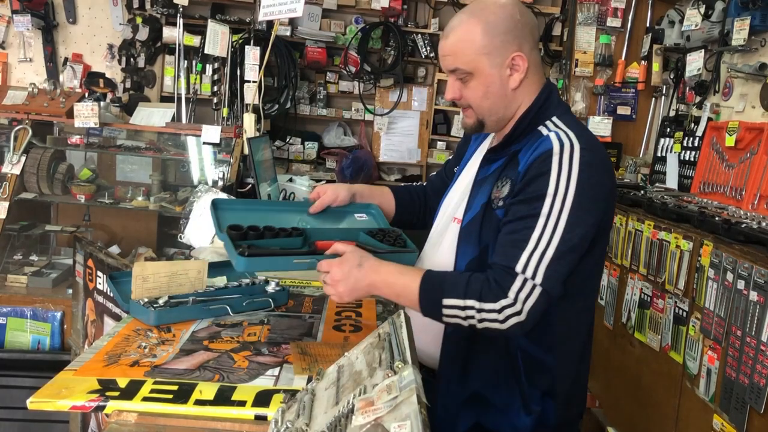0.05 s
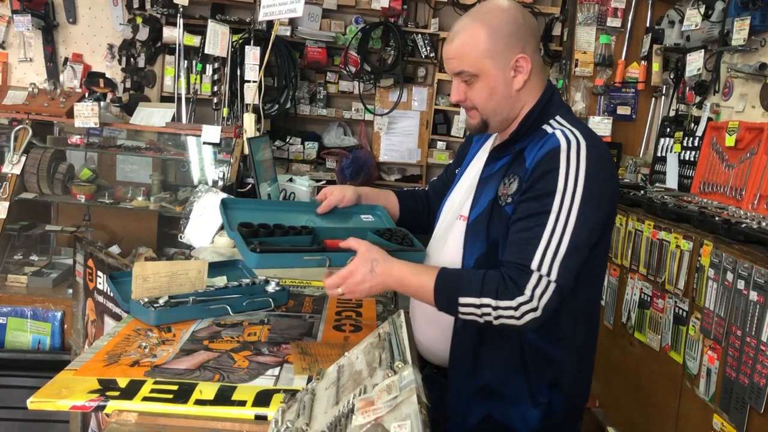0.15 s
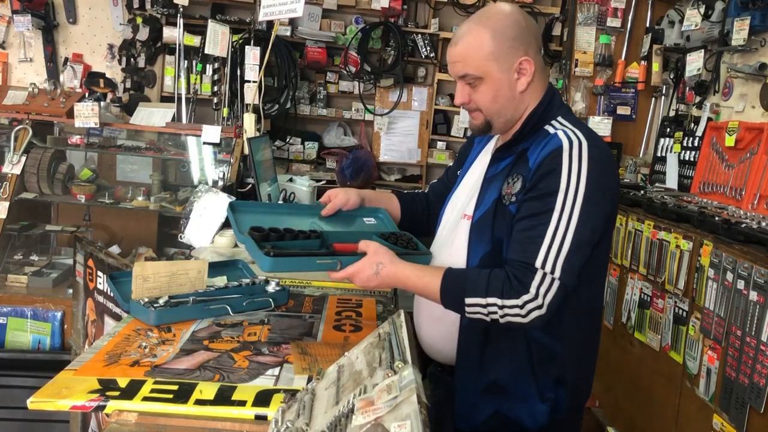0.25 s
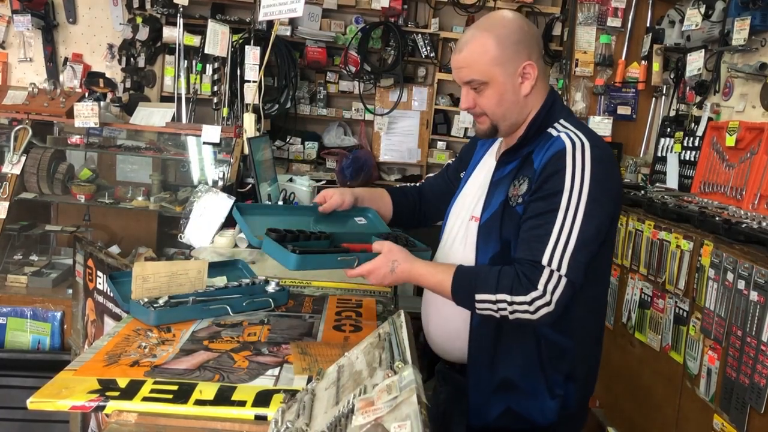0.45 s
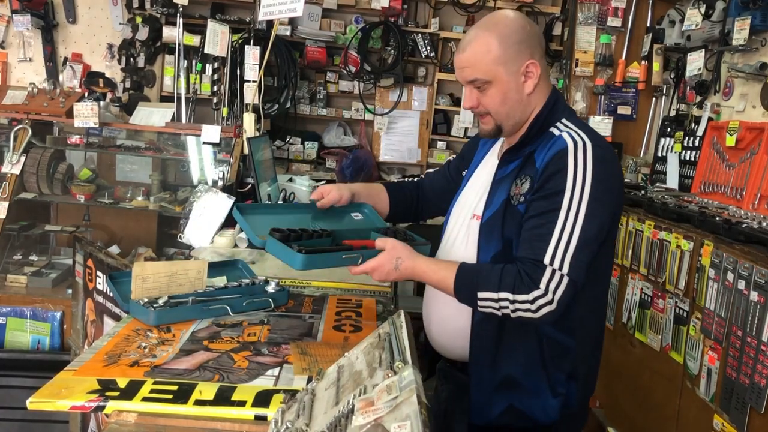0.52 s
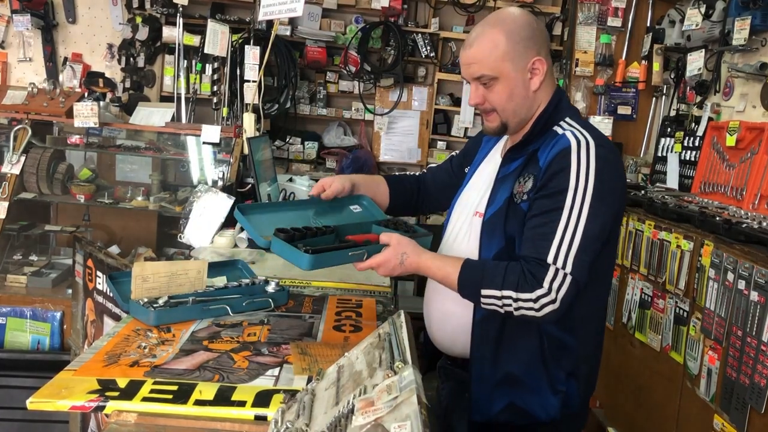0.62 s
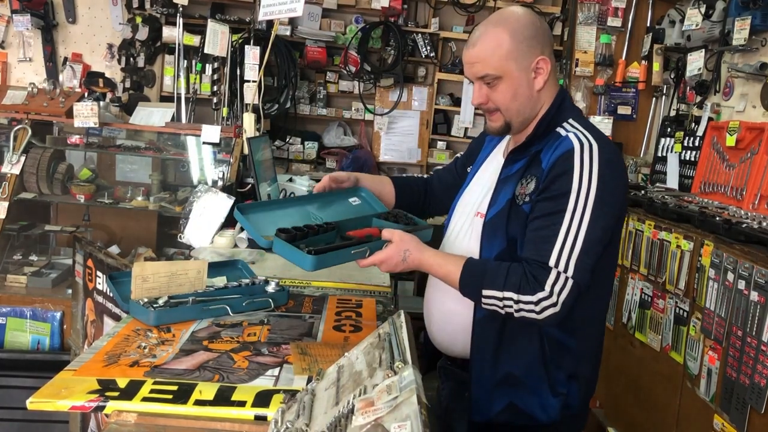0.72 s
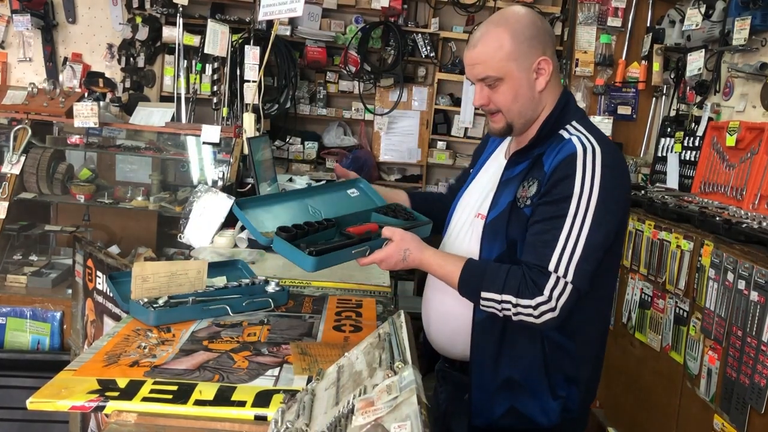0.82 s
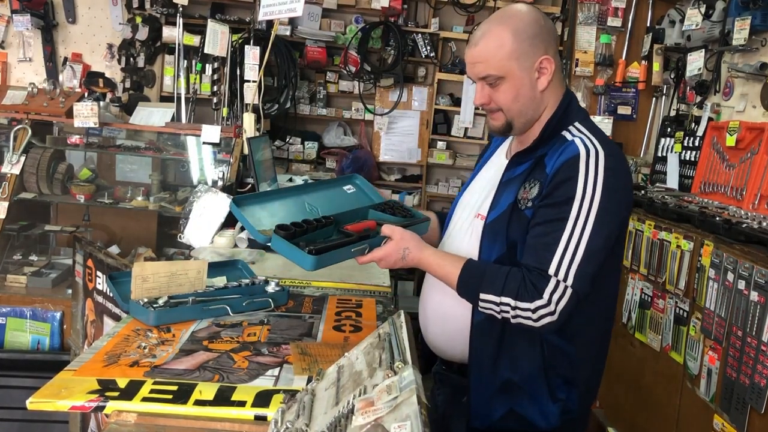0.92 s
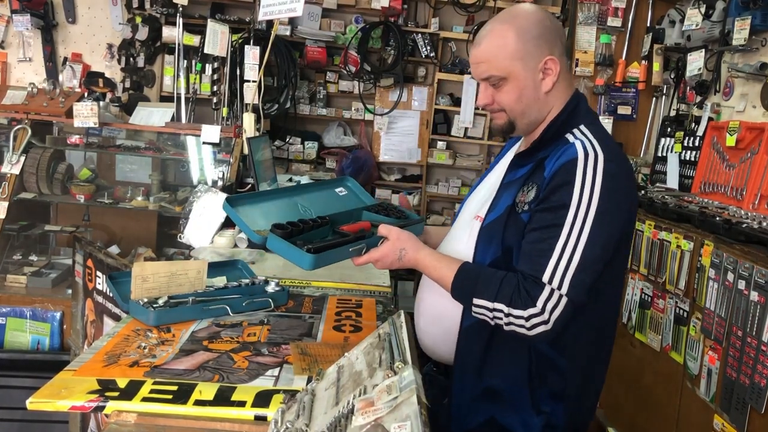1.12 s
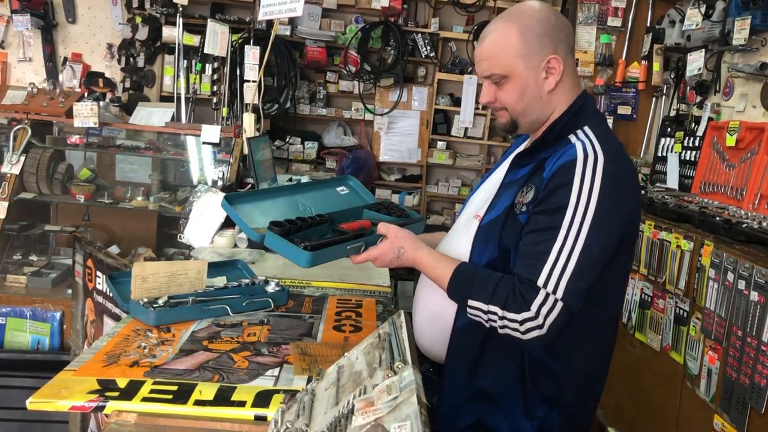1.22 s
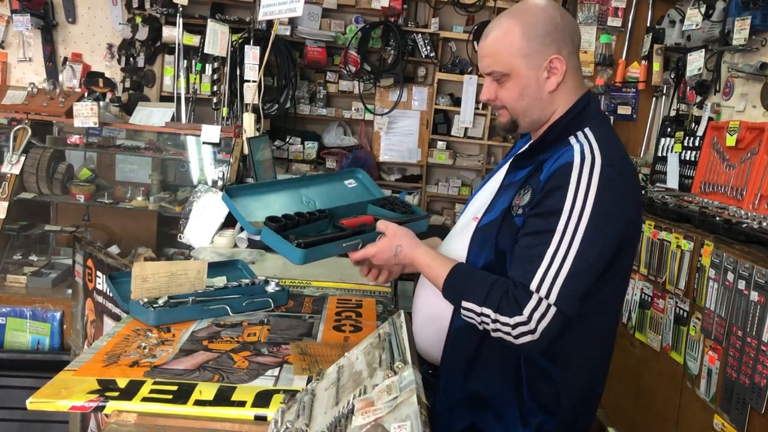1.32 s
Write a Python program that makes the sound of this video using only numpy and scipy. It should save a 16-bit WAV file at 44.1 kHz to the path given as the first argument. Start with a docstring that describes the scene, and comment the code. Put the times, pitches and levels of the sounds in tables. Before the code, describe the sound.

Two sharp plastic case latch snaps in a small shop, then faint tool ticks

```python
"""Latches of a plastic tool case

In a small shop two sharp latch snaps are heard, each led by a dull knock; later the tools shift and tick faintly.
Quick runs of tiny impacts ring the pitches of the latch, the shell, the tray or a tool.
The shop answers snaps, knocks, taps and ticks with dying noise; the hollow case keeps some pitches of it alive.
Underneath lie room tone and rumble (noise), hum (wavering sines) and the dying echo of an earlier clatter.
"""
import sys
import numpy as np
from scipy import signal
from scipy.io import wavfile

SR = 44100
rng = np.random.default_rng(int(sys.argv[2]) if len(sys.argv) > 2 else 0)


def transcribe(signal):
    """Save signal, clipped to [-1, 1], as a 16-bit WAV file at the path in sys.argv[1]."""
    frames = np.atleast_2d(signal).T
    limited = np.clip(frames, -1, 1)
    pcm = np.round(limited * 32767).astype(np.int16)
    wavfile.write(sys.argv[1], SR, pcm)


def rack_gain(trim_db):
    """Turn a fader trim in dB into the linear factor to multiply a signal by."""
    fader = np.asarray(trim_db, float)
    return 10 ** (fader / 20)


N = 59535  # length in samples

# Levels in these tables are relative: filters and the mix shape them further.
# edges of the third-octave noise bands: hz
BAND_EDGES = 30 * 2 ** np.arange(0, 9.3, 1 / 3)
# room tone, low and high parts each scaled afterwards: pitch_hz, level_db (per Hz)
ROOM_TONE_COLOUR = [(28, -22), (40, -14.5), (70, 0.5), (110, 2), (233, -1), (420, -1), (649, -15.5),
                    (1130, -17), (2010, -21.5), (5000, -28.5), (10000, -35.5), (16000, -39)]
# level of the room tone above 600 Hz over time: time_s, level_db
HIGH_TONE_LEVEL = [(0.0, -61.5), (0.5, -65), (0.6, -66), (0.7, -62.5), (0.84, -66.5), (1.0, -67.5),
                   (1.15, -68), (1.35, -74.5)]
# colour of the echo of an earlier clatter: pitch_hz, level_db (per Hz)
EARLIER_COLOUR = [(88, -49), (150, -20.5), (249, -2), (457, -3), (534, 0), (637, -13), (1660, -4),
                  (5570, -15.5), (16000, -46.5)]
# wavering tones of appliances: pitch_hz, level_db (rms, before the waver)
APPLIANCE_TONES = [(172.3, -75.5), (231.5, -78), (366.1, -76.5), (398.4, -89)]
# faint wavering tones that fade out: pitch_hz, level_db (rms, before the waver)
FADING_TONES = [(1157, -80), (1990, -87)]
# dull knocks of the case shell: full_s (the rattle reaches full strength),
# level_db, tilt_db (per octave), rattle_s (60 dB fall), echo_db, echo_tilt_db (per octave)
SHELL_KNOCKS = [(0.2198, -42, -0.1, .035, -32, -5.0), (0.2315, -50, -3.0, .03, -40, -5.0),
                (0.2920, -33, -0.5, .03, -22, -4.0), (0.450, -54, -5.0, .04, -36, -7.0)]
# ways the shell rings: pitch_hz, level_db, ring_s (60 dB fall, before the limit in strike)
SHELL_MODES = [(1190, -11, .012), (1305, -9, 0.079), (1730, -14, 0.0033), (1990, -2.5, 0.0052),
               (2043, -4.5, .04), (2364, -6.5, 0.018), (2788, -2.5, 0.035), (3620, -9, .012),
               (4490, 6.5, 0.0061), (5540, -10, .005), (6695, -2.5, 0.0016), (9900, -6, 0.0039)]
# single pitches, both lingering rings of the shell and small pings:
# start_s, level_db, pitch_hz, rattle_s (60 dB fall), ring_s (60 dB fall)
SINGLE_PITCHES = [(0.219, -48, 4530, .012, .012), (0.256, -42.5, 1300, .03, 0.06),
                  (0.311, -37, 770, 0.0081, 0.03), (0.331, -41, 1330, .03, .06),
                  (0.352, -41, 1170, 0.01, .03), (0.385, -46.5, 1304, .05, 0.055),
                  (0.39, -44, 2790, .03, 0.035), (0.461, -52, 833, 0.033, 0.045),
                  (0.925, -62, 3750, .03, 0.013), (0.989, -53.5, 4330, 0.0054, 0.011)]
# time the shop echo takes to fall 60 dB: pitch_hz, fall_s
ECHO_FALL = [(150, 0.24), (800, 0.43), (2100, 0.51), (5500, 0.33), (14600, .24)]
# colour of the shop echo: pitch_hz, level_db (per Hz)
ECHO_COLOUR = [(150, -34.5), (400, -10), (800, -10), (1300, -7), (2100, -9), (3300, -6), (5200, -1),
               (7800, -5.5), (10000, 2), (13500, -2.1), (16000, -7.5)]
# pitches the hollow case keeps alive in the tail: pitch_hz
HOLLOW_PITCHES = [585, 780, 1295, 1370, 2030, 2820, 3190, 3420, 3680, 4930, 5760, 10280, 12710, 13850]
# one row for each of those pitches: width_hz, level_db
HOLLOW_PEAKS = [(25, -6), (31.5, 6), (18, 7.5), (22, 1.5), (39.7, -2), (40, -7.5), (35, 2.5), (50, 2.5),
                (40, -1), (30, 3), (60, -3.5), (150, -3.5), (90, 6.5), (150, -1)]
# latch snaps and their rebounds: full_s (the rattle reaches full strength),
# level_db, tilt_db (per octave), rattle_s (60 dB fall), shell_db, echo_db, echo_tilt_db (per octave)
LATCH_SNAPS = [(0.2428, -27, -1.0, .035, -5, -12, -1.5), (0.2497, -33, -1.5, .03, -4, -25, -1.5),
               (0.2545, -38, -1.5, .02, -4, -30, -1.5), (0.3018, -18, 1.5, .016, -18, -1.5, 0.1),
               (0.3105, -29, -1.0, .025, -10, -28, -1.0), (0.3205, -31, 0.1, .015, -18, -30, 0.1)]
# ways the latch rings: pitch_hz, level_db, ring_s (60 dB fall, before the limit in strike)
LATCH_MODES = [(1900, -34.5, 0.018), (2960, -27, 0.0021), (3475, -5.5, 0.015), (4860, -10, 0.012),
               (5530, -1.5, 0.0046), (6100, 4, 0.00084), (6840, 1.5, 0.0005), (9510, 0, 0.0082),
               (10520, 3, 0.0037), (11170, -7, 0.001), (12430, 3, 0.009), (14260, 8, 0.012),
               (15400, -9.5, .004)]
# soft bumps of the case against the hand: start_s, level_db, pitch_hz, ring_s (60 dB fall)
HAND_BUMPS = [(0.303, -72, 115, .1), (0.306, -69, 175, .08), (0.31, -65.5, 240, .08),
              (0.305, -72, 335, .06), (0.451, -76, 377, 0.085), (0.749, -78, 111, .07)]
# a tool slides a little in its tray: middle_s, length_s, level_db (rms at the peak)
TOOL_SLIDES = [(0.627, 0.067, -55.5), (0.758, 0.064, -61.5), (0.998, 0.034, -67)]
# ways the tray rings under a slide: pitch_hz, level_db, ring_s (60 dB fall, before the limit in strike)
SLIDE_MODES = [(1430, 9.5, 0.019), (1800, 10.5, 0.034), (2230, 17, 0.0064), (2685, 7, 0.023),
               (4430, 2, 0.019)]
# grainy taps of a tool on its tray: full_s (the rattle reaches full strength),
# level_db, tilt_db (per octave), rattle_s (60 dB fall), echo_db, echo_tilt_db (per octave)
TRAY_TAPS = [(0.7444, -67.5, 9, .06, -35.5, -5), (0.9901, -71, -6, .06, -46.5, -8),
             (1.273, -81, -10.5, 0.025, -49, -5.5)]
# ways the tray rings under a tap: pitch_hz, level_db, ring_s (60 dB fall, before the limit in strike)
TRAY_MODES = [(930, 5, 0.01), (1420, 3, 0.015), (1900, -6, 0.014), (2280, 3, 0.0062), (4330, -4, .004),
              (6990, -6, .002)]
# a tool ticks in its tray: full_s (the rattle reaches full strength),
# level_db, lowest_pitch_hz, rattle_s (60 dB fall), echo_db, echo_tilt_db (per octave)
TOOL_TICKS = [(0.9215, -56, 3600, .006, -46, -2.5)]
# ways a ticking tool rings: ratio (to its lowest pitch), level_db, ring_s (60 dB fall, before the limit)
TOOL_MODES = [(1.0, 4, 0.0054), (1.95, 1.5, 0.011), (2.8, 2.5, 0.0041), (4.1, -11, .002)]
# a thin high hiss near the end: start_s, level_db, pitch_hz, ring_s (60 dB fall)
THIN_HISS = [(1.298, -53.5, 15400, 0.0096)]

RATTLE_RISE_S = 0.0011  # a rattle takes this long to reach full strength


def rms_one(x):
    """Scale a sound to an rms of 1."""
    return x / np.sqrt(np.mean(x ** 2) + 1e-20)


def at_hz(points, hz):
    """Read a table of pitch and value between its rows, with pitch on a log scale."""
    table = np.array(points)
    return np.interp(np.log(hz), np.log(table[:, 0]), table[:, 1])


def high_pass(x, hz):
    """Steep bass cut."""
    return signal.sosfilt(signal.butter(4, hz, "high", fs=SR, output="sos"), x)


def drift(rate_hz):
    """Slow random wander of spread 1: noise smoothed twice, made at every 40th sample."""
    r = np.exp(-80 * np.pi * rate_hz / SR)
    white = rng.standard_normal(N // 40 + 2002)
    slow = signal.lfilter([1], [1, -2 * r, r * r], white)[2000:]  # skip the filter's start
    return np.interp(np.arange(N) / 40, np.arange(len(slow)), rms_one(slow))


def bands():
    """Third-octave bands of noise with their centres in Hz; neighbours use different noise."""
    white = rng.standard_normal((2, N + 8000))
    out = []
    for k, (low, high) in enumerate(zip(BAND_EDGES, BAND_EDGES[1:])):
        band_filter = signal.butter(2, [low, high], "band", fs=SR, output="sos")
        noise = signal.sosfilt(band_filter, white[k % 2])[8000:]
        out.append((np.sqrt(low * high), noise))
    return out


def ring(x, hz, t60):
    """A damped resonance: a unit click sets a sine of height 1 ringing, down 60 dB after t60 seconds."""
    r = rack_gain(-60 / (t60 * SR))
    w = 2 * np.pi * hz / SR
    return signal.lfilter([0, np.sin(w)], [1, -2 * r * np.cos(w), r * r], x + 1e-18)


def rattle(start, t60):
    """A quick, dying run of tiny random impacts with a total energy of 1."""
    impacts_per_s = 16000
    t = np.arange(N) / SR - start
    rise = np.clip(t / RATTLE_RISE_S, 0, 1)
    fall = rack_gain(-60 * np.maximum(t, 0) / t60)
    impacts = (rng.random(N) < impacts_per_s / SR) * rng.standard_normal(N)
    run = rise * fall * impacts
    return run / np.sqrt(np.sum(run ** 2) + 1e-20)


def contact(full_s, t60):
    """A rattle begun early enough to reach full strength at full_s."""
    return rattle(full_s - RATTLE_RISE_S, t60)


def strike(force, modes, tilt_db):
    """A force rings every mode of a body; the tilt per octave turns about 4 kHz."""
    most_cycles = 100  # plastic rings no longer than this many cycles
    out = 0
    for hz, db, t60 in modes:
        level = rack_gain(db + tilt_db * np.log2(hz / 4000))
        out = out + level * ring(force, hz, min(t60, most_cycles / hz))
    return out


def room_tone():
    """Bands of noise: a steady low rumble and a high part that flickers and changes level."""
    t, noise = np.arange(N) / SR, bands()
    low = sum(rack_gain(at_hz(ROOM_TONE_COLOUR, hz)) * b for hz, b in noise if hz < 600)
    high = sum(rack_gain(at_hz(ROOM_TONE_COLOUR, hz) + 1.5 * drift(22)) * b for hz, b in noise if hz > 600)
    high_level = rack_gain(np.interp(t, *np.transpose(HIGH_TONE_LEVEL)))
    return rack_gain(-64.5) * rms_one(low) + high_level * rms_one(high)


def earlier_echo():
    """The echo of an earlier clatter is flickering noise that dies steadily away."""
    level_db, t60_s = -48.5, 0.66
    t = np.arange(N) / SR
    noise = sum(rack_gain(at_hz(EARLIER_COLOUR, hz) + 2 * drift(25)) * b for hz, b in bands() if hz > 150)
    return rack_gain(level_db - 60 * t / t60_s) * rms_one(noise)


def wavering_tone(hz, db, waver_db, waver_hz):
    """A sine of steady pitch whose level wanders."""
    t = np.arange(N) / SR
    level = rack_gain(db + waver_db * drift(waver_hz))
    return level * np.sqrt(2) * np.sin(2 * np.pi * (hz * t + rng.random()))


def hum():
    """Appliance tones, a low mains tone, and faint tones that fade out, all wavering sines."""
    fade_start_s, fade_s = 1.14, 0.04
    t = np.arange(N) / SR
    appliances = sum(wavering_tone(hz, db, 3.5, 16) for hz, db in APPLIANCE_TONES)
    mains = wavering_tone(48.6, -71, 1.8, 8)
    faint = sum(wavering_tone(hz, db, 3.5, 8.6) for hz, db in FADING_TONES)
    fade = np.clip((fade_start_s - t) / fade_s + 1, 0, 1)
    return appliances + mains + faint * fade


def shell(force, tilt_db):
    """The case shell rings in its own modes, with its bass cut."""
    return high_pass(strike(force, SHELL_MODES, tilt_db), 950)


def knocks():
    """Dull knocks: each contact rings the shell alone."""
    return sum(rack_gain(db) * shell(contact(full_s, t60), tilt_db)
               for full_s, db, tilt_db, t60, *_ in SHELL_KNOCKS)


def single_pitches():
    """Lingering rings of the shell, and small pings: each is a rattle ringing a single pitch."""
    return sum(rack_gain(db) * ring(rattle(s, rattle_t60), hz, t60)
               for s, db, hz, rattle_t60, t60 in SINGLE_PITCHES)


def shop():
    """Each snap, knock, tap and tick sends a click into the shop; reflections are noise dying by band."""
    level_db = -19.5
    gap_s, build_up_cycles = 0.0013, 2.4  # low reflections gather more slowly
    t, out = np.arange(N) / SR, 0
    for hz, noise in bands():
        # silent for half of this time, then growing over the whole of it
        gather_s = gap_s + build_up_cycles / hz
        build_up = np.clip(t / gather_s - 0.5, 0, 1)
        fall_db = 60 * t / at_hz(ECHO_FALL, hz)
        echo = rack_gain(at_hz(ECHO_COLOUR, hz) + level_db - fall_db) * noise * build_up
        for full_s, *_, db, tilt_db in LATCH_SNAPS + SHELL_KNOCKS + TRAY_TAPS + TOOL_TICKS:
            k = int(full_s * SR)
            delayed = np.pad(echo[:N - k], (k, 0))
            out = out + rack_gain(db + tilt_db * np.log2(hz / 4000)) * delayed
    return out + hollow_case(out)


def hollow_case(echo):
    """The hollow case keeps some pitches alive in the tail: narrow filters pick them from the echo."""
    out = 0
    for hz, (width_hz, db) in zip(HOLLOW_PITCHES, HOLLOW_PEAKS):
        out = out + rack_gain(db) * signal.lfilter(*signal.iirpeak(hz, hz / width_hz, SR), echo)
    return out


def snaps():
    """Snaps and rebounds ring latch and shell, with a broad crack from the bare impacts."""
    out = 0
    for full_s, db, tilt_db, t60, shell_db, *_ in LATCH_SNAPS:
        force = contact(full_s, t60)
        crack = rack_gain(-5) * np.diff(force, prepend=0)
        latch = high_pass(strike(force, LATCH_MODES, tilt_db) + crack, 1600)
        out = out + rack_gain(db) * (latch + rack_gain(shell_db) * shell(force, 0))
    return out


def thuds():
    """The case bumps softly against the hand: a one-way push rings a low mode of the loaded case."""
    contact_t60_s = 0.015
    return sum(rack_gain(db) * ring(np.abs(rattle(s, contact_t60_s)), hz, t60) for s, db, hz, t60 in HAND_BUMPS)


def slides():
    """A tool slides in its tray: dense grit under a smooth stroke rings the tray."""
    grains_per_s = 2500
    t = np.arange(N) / SR
    grit = rng.standard_normal(N) * (rng.random(N) < grains_per_s / SR)
    stroke = 0
    for middle, length, db in TOOL_SLIDES:
        stroke = stroke + rack_gain(db) * np.cos(np.pi * np.clip((t - middle) / length, -0.5, 0.5)) ** 2
    steady = strike(grit, SLIDE_MODES, 0)  # sets the scale
    return strike(grit * stroke, SLIDE_MODES, 0) / np.std(steady)


def taps():
    """Grainy taps of a tool ring its tray."""
    return sum(rack_gain(db) * strike(contact(full_s, t60), TRAY_MODES, tilt_db)
               for full_s, db, tilt_db, t60, *_ in TRAY_TAPS)


def ticks():
    """A tool ticks in its tray and rings at set ratios to its lowest pitch."""
    out = 0
    for full_s, db, lowest_hz, t60, *_ in TOOL_TICKS:
        modes = [(ratio * lowest_hz, mode_db, mode_t60) for ratio, mode_db, mode_t60 in TOOL_MODES]
        out = out + rack_gain(db) * strike(contact(full_s, t60), modes, 0)
    return out


def hiss():
    """A thin high hiss: a longer rattle rings one very high pitch."""
    rattle_t60_s = 0.11
    return sum(rack_gain(db) * ring(rattle(s, rattle_t60_s), hz, t60) for s, db, hz, t60 in THIN_HISS)


def scene():
    """Background, the sounds of case and tools, and the echo of the shop."""
    background = room_tone() + earlier_echo() + hum()
    case_and_tools = knocks() + single_pitches() + snaps() + slides() + taps() + ticks() + hiss()
    direct = high_pass(case_and_tools, 450) + thuds()  # the thuds keep their bass
    return (background + direct + shop())[None]


def band_limit(x):
    """A steep low-pass at the top of the band."""
    return signal.sosfilt(signal.butter(12, 17150, fs=SR, output="sos"), x)


def record(dry):
    """A steep filter cuts the top: everything above 16480 Hz is at least 50 dB down."""
    top_cut = signal.cheby2(12, 50, 16480, fs=SR, output="sos")
    mix = signal.sosfilt(top_cut, dry)
    return band_limit(mix)


dry = scene()
out = record(dry)
transcribe(out)
```